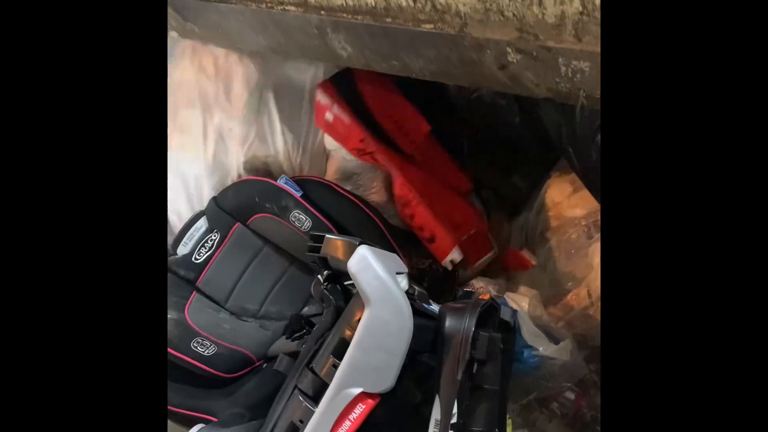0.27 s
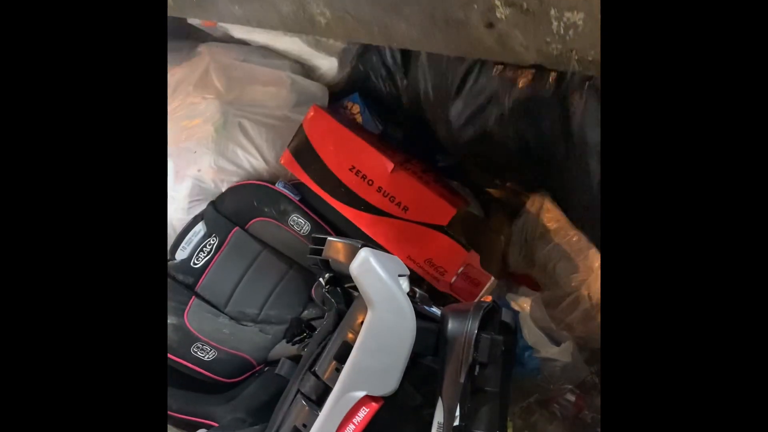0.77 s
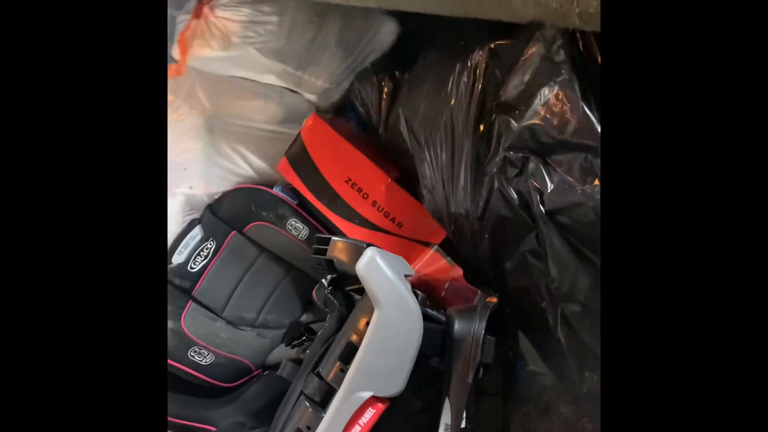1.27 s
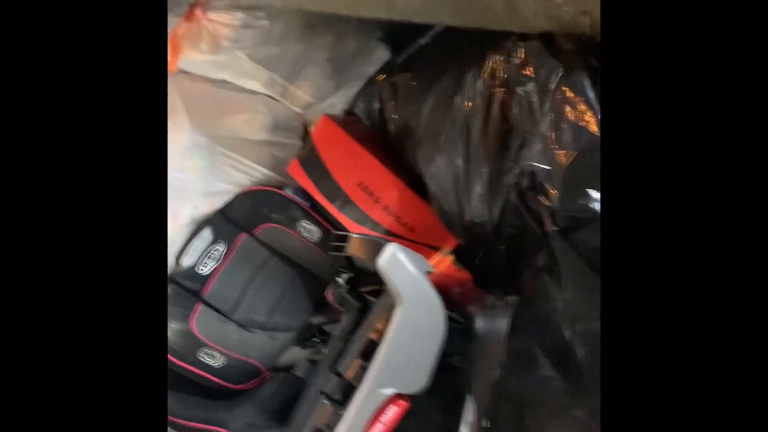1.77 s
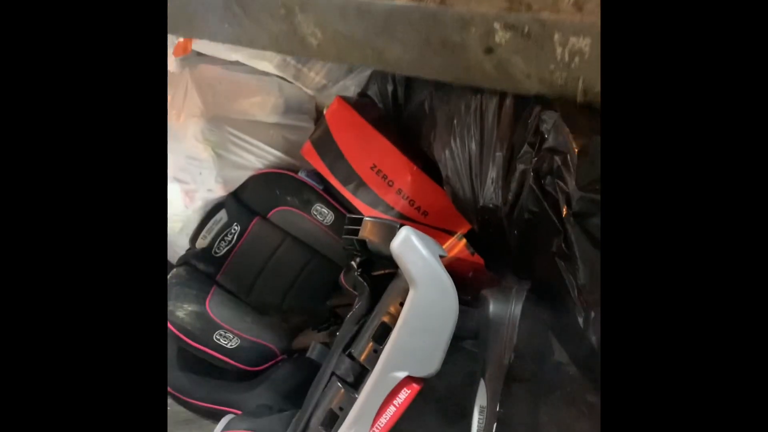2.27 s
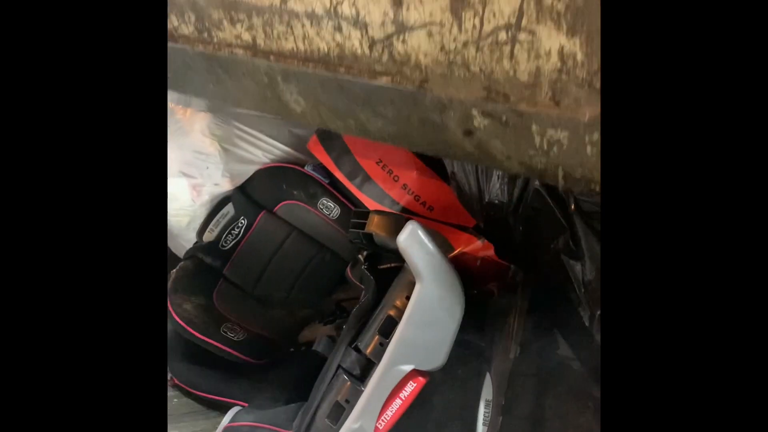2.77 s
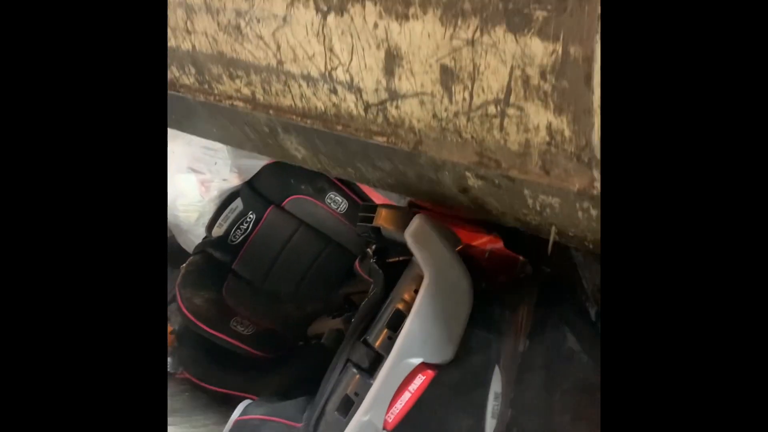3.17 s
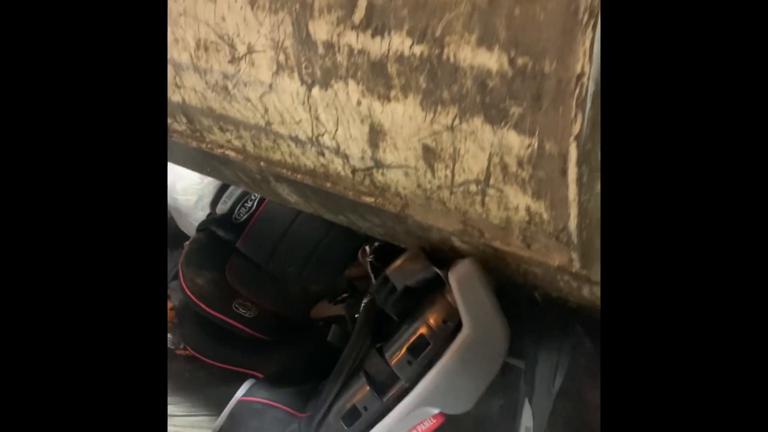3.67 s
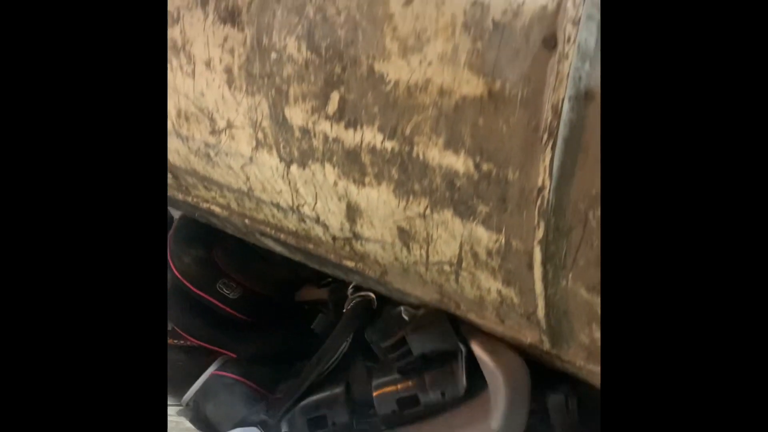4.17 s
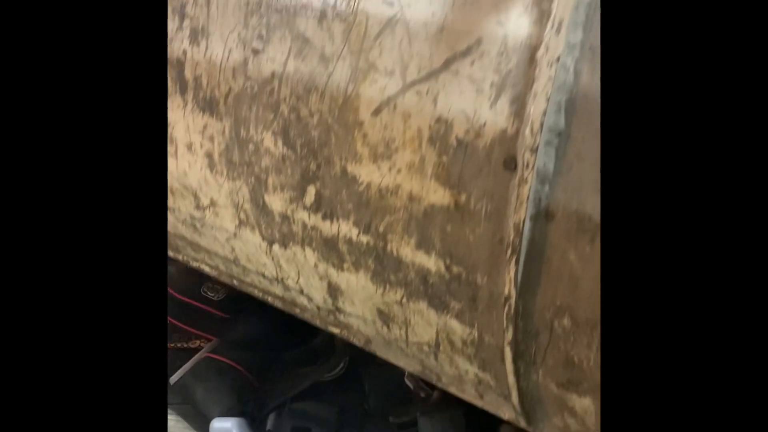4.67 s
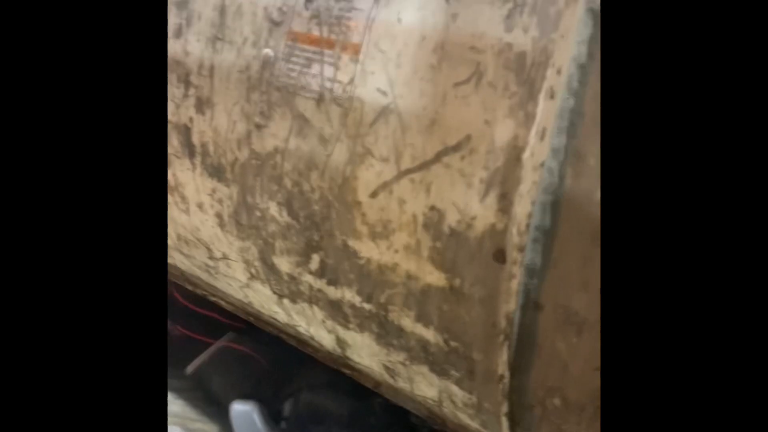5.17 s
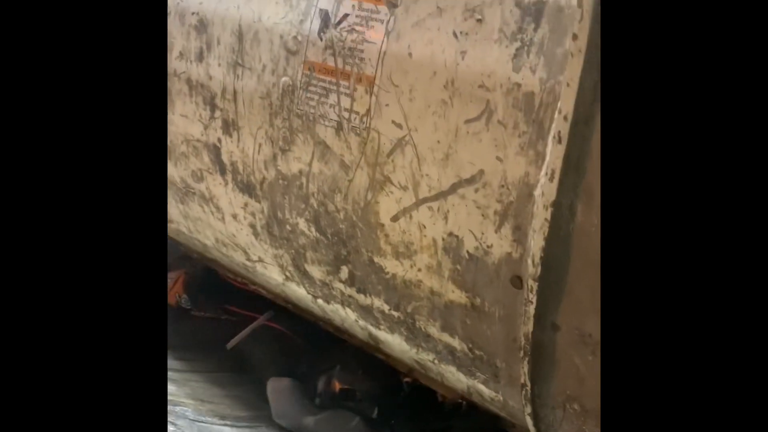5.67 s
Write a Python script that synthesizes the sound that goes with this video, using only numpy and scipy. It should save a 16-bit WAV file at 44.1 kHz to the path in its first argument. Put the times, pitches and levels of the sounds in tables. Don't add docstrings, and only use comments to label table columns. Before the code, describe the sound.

A garbage truck's hydraulic pump hums over engine rumble as its blade scrapes down, grinding and sharply cracking hard plastic among rustling bags.

```python
import sys
import numpy as np
from scipy import signal
from scipy.fft import rfft, irfft, next_fast_len
from scipy.io import wavfile

SR = 44100
rng = np.random.default_rng(int(sys.argv[2]) if len(sys.argv) > 2 else 0)


def dump(signal):
    limited = np.clip(np.atleast_2d(signal).T, -1, 1)
    pcm = np.round(limited * 32767).astype(np.int16)
    wavfile.write(sys.argv[1], SR, pcm)


def invert_db(level):
    return 10 ** (np.asarray(level, dtype=float) / 20)


N = 261072


def rms_one(x):
    return x / np.sqrt(np.mean(x ** 2) + 1e-20)


def in_time(rows):
    s, *columns = np.transpose(rows)
    return [np.interp(np.arange(N) / SR, s, c) for c in columns]


def drift(rate_hz):
    r = np.exp(-80 * np.pi * rate_hz / SR)
    slow = signal.lfilter([1], [1, -2 * r, r * r], rng.standard_normal(N // 40 + 2002))[2000:]
    return np.interp(np.arange(N) / 40, np.arange(len(slow)), rms_one(slow))


def resonate(x, hz, width_hz):
    r = np.exp(-np.pi * width_hz / SR)
    poles = [1, -2 * r * np.cos(2 * np.pi * hz / SR), r * r]
    return signal.lfilter([(1 - r * r) / 2, 0, (r * r - 1) / 2], poles, x)


def band(x, low_hz, high_hz):
    sos = signal.butter(2, [low_hz, min(high_hz, SR / 2.2)], "band", fs=SR, output="sos")
    return signal.sosfilt(sos, x)


def add_at(out, s, sound):
    at = round(s * SR)
    out[at:at + len(sound)] += sound


def grainy(spectrum, patchy_db, per_s, spread_db, grain_db):
    hz, level_db = np.transpose(spectrum)
    clicks = (rng.random(N) < per_s / SR) * invert_db(spread_db * np.minimum(rng.exponential(1, N), 4))
    clicks = clicks * rng.choice([-1, 1], N)
    source = rng.standard_normal((2, N)) + invert_db(grain_db) * rms_one(clicks)
    out, together = 0, drift(12.0)
    edges = hz[0] * 2 ** np.arange(0, np.log2(hz[-1] / hz[0]) + 1 / 3, 1 / 3)
    for k, (low, high) in enumerate(zip(edges, edges[1:])):
        db = np.interp(np.log(low * high) / 2, np.log(hz), level_db)
        flicker_db = patchy_db * (0.26 * together + drift(14.0))
        out = out + invert_db(db + flicker_db) * band(source[k % 2], low, high)
    return rms_one(out)


# time in seconds, piston rate in Hz, hum in dB, strain heard as overtone in dB.
PUMP = [(.2, 178.3, -23.5, -42), (.84, 178.5, -18, -35.5), (1.08, 180.5, -28, -49),
        (1.2, 178.5, -16.5, -42), (1.53, 180.5, -8, -50), (1.7, 179, -14.5, -31.5), (1.9, 169, -14, -39),
        (2.14, 162, -10, -31), (2.55, 163, -12, -35), (2.93, 179.5, -9.5, -39), (3.3, 189, -25, -39),
        (3.72, 190, -15.5, -41), (4.09, 186, -10, -37), (4.44, 179.5, -18.5, -57),
        (4.75, 179.5, -15.5, -32.5), (5.3, 177.5, -19.5, -41.5), (5.66, 184, -27, -41),
        (5.74, 186.5, -38, -44.5)]
# multiple of the piston rate, level in dB.
BUZZ = [(3, 2.5), (4, -6), (5, -11.5), (6, -11), (7, -6.5), (8, -14), (9, -8), (10, -13)]
# time in seconds, level in dB.
BUZZ_LEVEL = [(0, -41), (.55, -42), (1.1, -44), (1.5, -52), (2.25, -44), (2.8, -46), (3.5, -49.5),
              (4.1, -51.5), (4.8, -55), (5.9, -54)]
# time in seconds, half width in seconds, rest in dB.
CANCELS = [(1.114, 0.013, -24), (1.58, 0.024, 0), (1.612, 0.062, -39), (1.658, 0.011, -41),
           (1.8, 0.025, -3), (1.988, 0.035, -19), (2.587, 0.065, -32), (2.827, 0.061, -17),
           (3.08, 0.03, -34), (3.936, 0.27, -68), (4.149, 0.0082, -33), (5.155, 0.14, -15),
           (5.71, 0.016, 0), (5.9, 0.039, -20)]


def pump():
    (hz, hum_db, strain_db), t = in_time(PUMP), np.arange(N) / SR
    turn = 2 * np.pi * np.cumsum(hz + 0.676 * drift(9.9)) / SR
    buzz = sum(invert_db(db + 2.0 * drift(11.0)) * np.sin(k * turn + k * k) for k, db in BUZZ)
    hum = np.exp(1j * turn)
    for s, half_s, rest_db in CANCELS:
        swing, rest = np.tanh((t - s) / half_s), min(invert_db(rest_db), 1)
        hum = hum * (swing + 1j * rest * (1 - swing ** 2))
    tones = invert_db(hum_db + 0.33 * drift(25.0)) * hum.imag
    tones = tones + invert_db(strain_db + 1.4 * drift(10.4)) * np.sin(2 * turn + 1)
    return np.sqrt(2) * (tones + invert_db(in_time(BUZZ_LEVEL)[0]) * buzz)


def throb():
    free_hz, idle_db, db_per_hz = 173.8, -60.5, 2.5
    sag_hz = np.maximum(free_hz - in_time(PUMP)[0], 0)
    return invert_db(idle_db + db_per_hz * sag_hz) * rms_one(band(rng.standard_normal(N), 45.0, 71.0))


# time in seconds, level in dB.
SHAKE = [(0, -29.5), (.2, -37), (1.1, -40), (1.45, -28), (1.59, -20.5), (1.75, -27.5), (1.95, -29.5),
         (2.08, -34.5), (2.7, -36.5), (2.8, -33), (3, -37.5), (3.5, -34), (3.9, -34.5), (4, -32),
         (4.14, -49), (4.8, -39.5), (5.15, -36.5), (5.43, -36), (5.7, -45.5)]
# frequency in Hz, density in dB per Hz.
RUMBLE = [(22, -40), (35, -10), (55, 3.5), (95, 3.5), (135, 2.5), (220, -0.5), (320, -17)]


def rumble():
    return invert_db(in_time(SHAKE)[0] + 4.5) * grainy(RUMBLE, 5.7, per_s=10.0, spread_db=-63.0, grain_db=-14.0)


# time in seconds, level in dB.
CRUSH = [(0, -33.5), (.2, -39), (.54, -39.5), (.8, -45.5), (1.2, -41), (1.48, -39), (1.7, -45), (1.95, -47),
         (2.75, -48), (2.8, -43.5), (2.96, -44), (3.39, -42), (3.52, -31), (3.7, -29.5), (4.14, -39.5),
         (4.19, -40.5), (4.8, -39.5), (5.2, -47.5)]
# frequency in Hz, density in dB per Hz.
DRONE = [(130, -3), (210, 5.5), (270, -2), (325, 5), (390, 1), (480, 2.5), (600, -15), (900, -14),
         (1400, -10)]


def drone():
    (shake_db,), (crush_db,) = in_time(SHAKE), in_time(CRUSH)
    db = np.minimum(-31.5 + 0.3 * (shake_db + 31.0) + 0.2 * (crush_db + 35.0), -26)
    return invert_db(db + 0.9) * grainy(DRONE, 1.1, per_s=60., spread_db=0.5, grain_db=-17.0)


# time in seconds, crunch in dB, rustle in
# dB, half width in seconds.
SWELLS = [(0.112, -34, -49, 0.0091), (0.234, -29.5, -54, 0.026), (0.425, -32, -24.5, 0.0082),
          (0.461, -44, -39, 0.063), (.84, -49, -34, 0.087), (1.044, -49, -38, 0.058),
          (1.302, -37.5, -32.5, 0.011), (1.41, -36.5, -36, 0.011), (1.536, -43, -34, 0.02),
          (1.602, -41.5, -32, 0.013), (1.668, -41, -74, 0.0072), (3.635, -46, -26, 0.012),
          (4.081, -40, -40.5, 0.1), (4.093, -26, -46, 0.0085), (4.447, -25, -26.5, 0.0028),
          (4.796, -27.5, -43, 0.011), (4.817, -37, -26, 0.0037), (4.937, -21, -40, 0.0049),
          (5.08, -47, -20, 0.0092), (5.1, -41, -52, 0.0093), (5.251, -38, -35, 0.023)]


def swells(column):
    gain, t = np.zeros(N), np.arange(N) / SR
    for row in SWELLS:
        s, half_s = row[0], row[3]
        near = slice(max(int((s - 3 * half_s) * SR), 0), int((s + 3 * half_s) * SR))
        gain[near] += invert_db(row[column]) * np.exp(-((t[near] - s) / half_s) ** 2)
    return gain


# frequency in Hz, density in dB per Hz.
CRUNCH = [(600, 3), (900, -8.5), (1300, -1.5), (2000, -3), (3000, -6.5), (4200, -8.5), (6000, -9)]


def crunch():
    gain = invert_db(in_time(CRUSH)[0] + 2.5) + swells(1)
    return gain * grainy(CRUNCH, 1.5, per_s=350., spread_db=5., grain_db=-3.)


# frequency in Hz, density in dB per Hz.
RUSTLE = [(2200, -17), (3500, -6.5), (5500, 0.5), (8000, -3.5), (12000, -5), (15000, -11), (17000, -17)]


def rustle():
    db = -43 + 1.2 * (in_time(CRUSH)[0] + 41.0)
    gain = invert_db(db + 4.5) + swells(2)
    return gain * grainy(RUSTLE, 2.04, per_s=400.0, spread_db=4.5, grain_db=-4.5)


# start in seconds, peak in dB, swell in seconds,
# t60 in seconds, body pitch in Hz.
THUDS = [(0.061, -20.5, 0.017, 0.43, 93.4), (.41, -16.5, 0.0082, 0.13, 410), (1.516, -11, 0.012, 0.12, 480),
         (1.53, -20, 0.0032, 0.083, 403), (1.558, -12, 0.0031, 0.45, 416),
         (1.576, -11.5, 0.0075, 0.23, 109), (1.638, -34, 0.0058, 0.11, 127),
         (4.081, -14, 0.0074, 0.085, 75.4), (4.091, -22, 0.0058, 0.22, 279),
         (4.265, -17.5, 0.0092, 0.054, 270), (4.449, -12, 0.0016, 0.03, 393),
         (4.821, -6.5, 0.0003, 0.046, 324), (5.047, -16.5, 0.0014, 0.011, 452),
         (5.07, -14.5, 0.0018, 0.25, 393), (5.385, -22.5, 0.0053, 0.75, 318),
         (5.418, -23, 0.0015, 0.0037, 584), (5.561, -20.5, 0.0044, 0.049, 385)]
# frequency in Hz, width in Hz.
HOPPER = [(95, 28), (150, 41), (270, 30), (390, 52), (480, 36), (620, 48), (800, 13)]


def thuds():
    out, t = np.zeros(N + SR), np.arange(SR // 3) / SR
    for s, peak_db, swell_s, t60_s, body_hz in THUDS:
        rise = 1 - np.exp(-t / swell_s)
        push = rng.standard_normal(len(t)) * rise * invert_db(-60 * t / t60_s)
        shake = 0
        for hz, width_hz in HOPPER:
            answer = invert_db(-13.0 * abs(np.log2(hz / body_hz)))
            shake = shake + answer * resonate(push, hz, width_hz) / np.sqrt(width_hz)
        swing = np.sin(2 * np.pi * body_hz * t) * rise * invert_db(-60 * t / (.7 * t60_s))
        shake = shake / np.max(np.abs(shake)) + .55 * swing
        add_at(out, s, invert_db(peak_db) * shake / np.max(np.abs(shake)))
    return out[:N]


# start in seconds, peak in dB, pitch in Hz, t60 in seconds.
MORE_RINGS = [(.062, -34, 1450, .05), (.07, -20.5, 327, 0.049), (.415, -28, 1190, 0.04),
              (.465, -32, 1170, 0.052), (.945, -22, 403, 0.011), (1.526, -38, 520, 0.037),
              (1.533, -7.5, 384, 0.13), (1.542, -8.5, 455, 0.035), (1.55, -17, 105, 0.085),
              (1.575, -17, 424, 0.036), (1.59, -14, 398, 0.039), (1.645, -15.5, 92, 0.11),
              (1.685, -22, 230, 0.062), (1.88, -21.5, 53.3, 0.12), (1.935, -31, 54, 0.38),
              (3.78, -30, 30.4, 0.11), (1.556, -19, 555, 0.033), (4.14, -25, 305, 0.1), (4.385, -33, 436, 0.044),
              (4.825, -19.5, 286, 0.03), (4.823, -31, 35, 0.05), (4.83, -32, 1085, 0.097),
              (4.833, -27.5, 1537, 0.11), (4.84, -39, 2280, 0.075), (4.945, -14, 305, 0.017),
              (4.952, -29.5, 1410, 0.066), (4.955, -27.5, 1176, 0.18), (5.05, -28, 449, 0.14),
              (5.073, -21, 2800, 0.023), (5.074, -18, 375, 0.024), (5.086, -18, 378, 0.049),
              (5.11, -35, 1770, .03), (5.04, -26, 283, 0.12), (5.07, -21.5, 289, .07), (5.12, -27, 300, 0.056),
              (5.282, -27, 1950, 0.055), (4.925, -30, 274, 0.048), (5.4205, -20, 2024, 0.024),
              (1.42, -30, 620, .05)]
# start in seconds, peak in dB, pitch in Hz, t60 in seconds.
PIECES = [(.4366, -27, 1324, .07), (.438, -25, 1061, .042), (1.5294, -21, 1400, .026),
          (1.539, -14, 770, .09), (1.565, -27, 900, .04), (1.668, -27, 1500, .03), (3.498, -29, 845, .025),
          (3.499, -27, 1217, .018), (3.5613, -27, 1857, .07), (3.563, -29, 1502, .06),
          (3.643, -21, 2000, .02), (3.644, -27, 657, .08), (3.653, -18, 1120, .025),
          (3.678, -27, 1599, .018), (3.6796, -21, 1340, .04), (3.907, -26, 1600, .02),
          (3.995, -27, 1800, .03), (4.054, -30, 1227, .08), (4.0936, -16, 2724, .03),
          (4.0974, -17, 2180, .018), (4.122, -27, 1500, .03), (4.1373, -23, 1647, .03),
          (4.1376, -20, 2169, .035), (4.2658, -23, 2697, .022), (4.2675, -23, 1012, .06),
          (4.333, -30, 1723, .018), (4.3336, -34, 1410, .08), (4.385, -25, 1340, .018),
          (4.388, -30, 910, .065), (4.45, -20, 3548, .02), (4.451, -20, 1556, .035),
          (4.5346, -35, 1529, .044), (4.5357, -36, 684, .035), (4.6696, -29, 2150, .02),
          (4.7113, -30, 754, .02), (4.718, -31, 1244, .022), (4.824, -18, 2500, .02),
          (4.825, -23, 668, .025), (4.8253, -15, 1540, .06), (4.944, -18, 1755, .018),
          (4.946, -16, 1087, .025), (5.0465, -20, 2525, .018), (5.047, -22, 1620, .018),
          (5.065, -28, 1373, .1), (5.085, -26, 1335, .05), (5.1564, -36, 1125, .1),
          (5.1567, -31, 2105, .018), (5.272, -20, 2778, .018), (5.3944, -31, 1394, .035),
          (5.4205, -17, 668, .03), (5.428, -23, 1130, .035)]


def rings():
    rise_cycles, pair_ratio, pair_db, rough = 0.57, 1.06, 1.5, .9
    out, t = np.zeros(N + SR), np.arange(SR // 4) / SR
    for (s, peak_db, hz, t60_s), (phase, side) in zip(PIECES + MORE_RINGS, rng.random((99, 2))):
        other_hz = hz * pair_ratio ** (2 * side - 1)
        pair = np.sin(2 * np.pi * hz * t) + invert_db(pair_db) * np.sin(2 * np.pi * (other_hz * t + phase))
        rattle = rms_one(resonate(rng.standard_normal(len(t)), hz, hz / 4))
        shape = (1 - np.exp(-t * hz / rise_cycles)) * invert_db(-60 * t / max(t60_s, .005))
        add_at(out, s, invert_db(peak_db) * (pair + rough * rattle) * shape / shape.max())
    return out[:N]


# start in seconds, peak in dB.
TICKS = [(0.0892, -21.5), (0.314, -21.5), (1.285, -34), (1.3921, -16.5), (1.486, -20), (1.778, -27),
         (1.841, -26), (1.8776, -24.5), (1.9514, -29), (2.0167, -26.5), (2.0293, -30.5), (2.1898, -28),
         (2.237, -33), (2.256, -27), (2.2896, -22.5), (2.3525, -24.5), (2.418, -29), (2.4503, -26.5),
         (2.487, -28), (2.6662, -35.5), (2.1686, -36), (2.272, -31), (3.464, -21), (3.678, -23),
         (3.7577, -18), (3.9107, -24), (1.42, -30), (1.593, -32), (2.0518, -32), (2.567, -18), (3.5414, -8),
         (3.8, -12), (3.9844, -12), (4.0966, -19), (1.7357, -35), (4.361, -26), (4.3904, -27),
         (1.9198, -36), (4.9427, -31), (2.5377, -32.5), (5.2719, -6), (2.082, -35), (5.419, -14),
         (4.729, -17.5), (4.9148, -30), (5.7177, -29)]


def ticks():
    out, t = np.zeros(N + SR), np.arange(SR // 20) / SR
    for s, peak_db in TICKS:
        burst = rng.standard_normal(len(t)) * (np.exp(-t / 0.00027) + 0.15 * np.exp(-t / 0.0024))
        click = band(burst, 4200, 13600.0) + 0.59 * resonate(burst, rng.uniform(5000, 8500), 2000.)
        click = click + 0.42 * band(burst, 10400.0, 19800.0)
        add_at(out, s, invert_db(peak_db + 8.0) * click / np.max(np.abs(click)))
    return out[:N]


# start in seconds, peak in dB, relative sizzle in dB, ring in Hz.
SPLITS = [(0.204, -22, -19.5, 1700), (0.542, -27, 0, 1090), (1.4183, -25, 3.5, 1580),
          (1.8054, -21, -8.5, 1380), (2.5663, -31, 1, 1150), (3.54, -33, 13, 1925), (3.9847, -25, 1, 1780),
          (4.0956, -5.5, -9, 2110), (4.124, -18, -34, 1510), (4.2659, -7.5, -9, 980),
          (4.6694, -16.5, -14.5, 2300), (4.7755, -24.5, 0, 885), (5.047, -10.5, -12, 1650),
          (5.064, -12, -10, 1380), (5.0836, -11.5, -13, 1330), (5.1577, -17, -14, 1110),
          (5.271, -6, -12, 2780)]
# start in seconds, peak in dB, relative sizzle in dB, ring in Hz.
BREAKS = [(0.4357, -20, -14, 1120), (1.536, -14.5, -15.5, 750), (3.6419, -11, -31, 1074),
          (3.6785, -14.5, -2, 1296), (3.7988, -23.5, 7.5, 1900), (4.137, -8, -13, 2020),
          (4.3332, -28, -33, 1630), (4.3852, -14.5, -6, 1370), (4.451, -12, -0.5, 1630),
          (4.532, -29.5, -20, 1330), (4.7116, -16.5, -14, 1180), (4.8237, -4.5, -15, 1660),
          (4.9425, -9.5, -3, 1100), (5.3928, -48, -22, 1542), (5.418, -7, -13, 850)]


def snaps():
    lead, t60_s = SR // 40, 0.1
    out, t = np.zeros(N + SR), (np.arange(SR // 6) - lead) / SR
    after = np.maximum(t, 0)
    creak = 0.033 * np.exp(np.minimum(t, 0) / 0.0043) * (t < 0)

    def fade(share, rise_s):
        return creak + (1 - np.exp(-after / rise_s)) * invert_db(-60 * after / (share * t60_s))

    kinds = [(*row, 7) for row in BREAKS] + [(*row, -17) for row in SPLITS]
    for s, peak_db, sizzle_db, ring_hz, knock_db in kinds:
        steps = rng.standard_normal((4, len(t) // 60 + 1)).repeat(60, axis=1)[:, :len(t)]
        slips = rng.standard_normal((4, len(t))) * invert_db(3.5 * steps)
        shell = rms_one(band(slips[0], 0.74 * ring_hz, 3600.0 + 1.84 * ring_hz))
        shell = shell * (0.43 * fade(0.91, 0.00053) + 1.0 * fade(0.25, 0.00024))
        clatter = rms_one(band(slips[3], 0.38 * ring_hz, 2.6 * ring_hz)) * fade(1.6, 0.0022)
        splinter_hz = 4200 * 2 ** rng.uniform(0, 1.2, 3)
        splinters = sum(resonate(slips[0] * fade(.6, .0006), hz, hz / 16) for hz in splinter_hz)
        sizzle = rms_one(band(slips[1], 2800.0, 13000.0))
        sizzle = sizzle * (0.77 * fade(0.11, .0001) + fade(0.16, 0.0013) + 0.069 * fade(1.33, 0.0025))
        knock = rms_one(band(slips[2], 260.0, 1370.0)) * fade(0.52, 0.01)
        crack = shell + 0.32 * clatter + invert_db(knock_db) * knock
        crack = crack + invert_db(sizzle_db + 10.5) * (sizzle + 2.12 * splinters)
        add_at(out, s, invert_db(peak_db - 8.5) * crack)
    return out[lead:N + lead]


# time in seconds, level in dB.
SCRAPE = [
    (2.76, -57),
    (2.785, -30),
    (3.1, -30),
    (3.4, -29),
    (3.6, -31),
    (4.1, -32),
    (4.15, -65),
]
# frequency in Hz, width in Hz, level in dB.
PLATE = [(1290, 200, -32), (1930, 630, 10.5), (2800, 150, -1), (3325, 370, 9.5), (4110, 600, 10.5),
         (4970, 220, 6.5), (5750, 870, 12), (8720, 2700, 9), (10950, 1500, -8), (14000, 3900, -6)]


def scrape():
    rub, plate = rng.standard_normal(N), 0
    for hz, width_hz, db in PLATE:
        plate = plate + invert_db(db + 2.0 * drift(20.0)) * rms_one(resonate(rub, hz, width_hz))
    return invert_db(in_time(SCRAPE)[0]) * rms_one(plate)


# time in seconds, pitch in Hz, level in dB.
SQUEAL = [
    (2.8, 6340, -45),
    (2.85, 6380, -41),
    (2.885, 5840, -30),
    (2.92, 5860, -38),
    (2.96, 5730, -33),
    (3.04, 5660, -32),
    (3.08, 5640, -40),
    (3.15, 5630, -38),
    (3.3, 5600, -62),
]


def squeal():
    hz, db = in_time(SQUEAL)
    wobble = signal.sosfilt(signal.butter(2, 95., fs=SR, output="sos"), rng.standard_normal((2, N)))
    turn = 2 * np.pi * np.cumsum(hz) / SR
    return invert_db(db) * rms_one(wobble[0] * np.cos(turn) + wobble[1] * np.sin(turn))


def blade():
    t = np.arange(N)
    return (t > SCRAPE[0][0] * SR) * (t < SCRAPE[-1][0] * SR) * (scrape() + squeal())


# time in seconds, level in dB.
GRIND = [
    (3.42, -52),
    (3.47, -40),
    (3.58, -26),
    (3.63, -27.5),
    (3.72, -41),
    (3.82, -28.5),
    (3.88, -40),
    (4, -33),
    (4.1, -42),
    (4.16, -72),
]


def grind():
    hz, width_hz, per_s = 1950, 860, 1100
    slips = (rng.random(N) < per_s * invert_db(5 * drift(40.)) / SR) * invert_db(4 * rng.standard_normal(N))
    slips = slips * rng.choice([-1, 1], N) + 1e-18
    return invert_db(in_time(GRIND)[0]) * rms_one(resonate(resonate(slips, hz, width_hz), hz, 2 * width_hz))


# start in seconds, depth in dB.
DUCKS = [
    (4.103, -11.5),
    (4.273, -5),
    (4.456, -15),
    (4.826, -6.5),
    (4.949, -8),
    (5.1, -2),
    (5.29, -2),
]


def ducking():
    drop_s, hold_s, recover_db_per_s = 0.0023, 0.069, 83
    t, down_db = np.arange(N) / SR, np.zeros(N)
    for s, depth_db in DUCKS:
        back_db = recover_db_per_s * np.maximum(t - s - hold_s, 0)
        down_db += np.minimum(depth_db + back_db, 0) * np.clip((t - s) / drop_s, 0, 1)
    return invert_db(down_db)


# frequency in Hz, right lag in radians, likeness 0-1, left over right in dB.
PORTS = [(0, 0, 1, 0), (200, -.24, 1, 0), (450, -.65, .87, -3.3), (900, -.35, .7, -2.8),
         (1500, .1, .65, -.5), (2500, .9, .06, 0), (3400, 1.5, .45, 0)]


def ports(steady, hits):
    lag_s, in_step_hz, treble_hz, treble_likeness = 1 / 4190, 2650, 4300, 0.89
    size = next_fast_len(N + 4096)
    hz = np.arange(size // 2 + 1) * SR / size
    rows = PORTS + [(treble_hz, 2 * np.pi * lag_s * (treble_hz - in_step_hz), treble_likeness, 0)]
    row_hz, *columns = np.transpose(rows)
    lag, alike, tilt_db = (np.interp(hz, row_hz, c) for c in columns)
    lag = np.where(hz > treble_hz, 2 * np.pi * lag_s * (hz - in_step_hz), lag)
    chance = 1.2 * rng.standard_normal(2000)
    fine, coarse = (np.interp(hz / step_hz, np.arange(2000), chance) for step_hz in (12, 150))
    scatter = np.sqrt(-2 * np.log(np.clip(alike, .05, 1)))
    half = invert_db(tilt_db / 2) * np.exp(.5j * lag)
    blur, smear = np.exp(.5j * scatter * fine), np.exp(.4j * scatter * coarse)
    far, near = rfft(steady, size), rfft(hits, size)
    left = (far * blur + near * smear) * half
    right = (far / blur + near / smear) / half
    return irfft([left, right], size)[:, :N]


def scene():
    bed = pump() + throb() + rumble() + drone() + crunch() + rustle()
    return ports(ducking() * bed + thuds() + blade() + grind(), rings() + ticks() + snaps())


def roll_off(x):
    return signal.sosfilt(signal.butter(12, 16830, fs=SR, output="sos"), x)


def record(dry):
    rounded = .86 * np.tanh(dry / .86)
    mix = signal.sosfilt(signal.cheby2(12, 60, 16800, fs=SR, output="sos"), rounded)
    return roll_off(mix)


dry = scene()
out = record(dry)
dump(out)
```